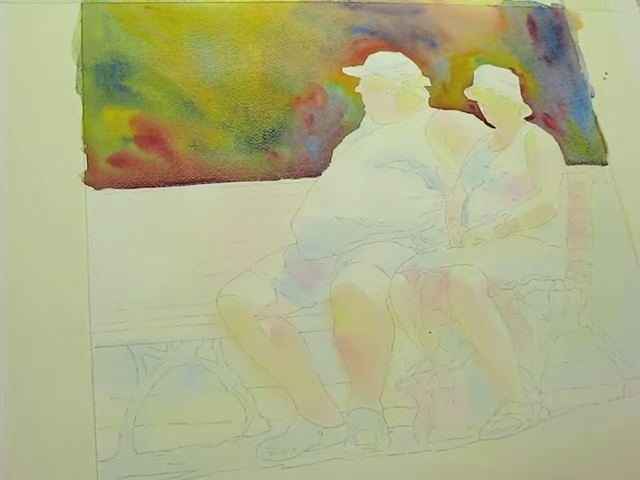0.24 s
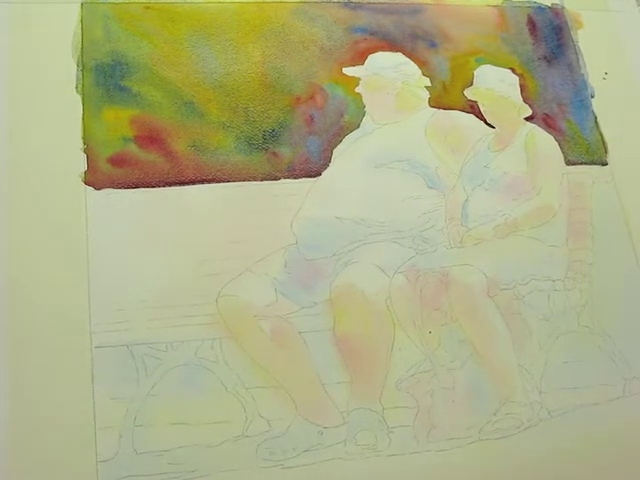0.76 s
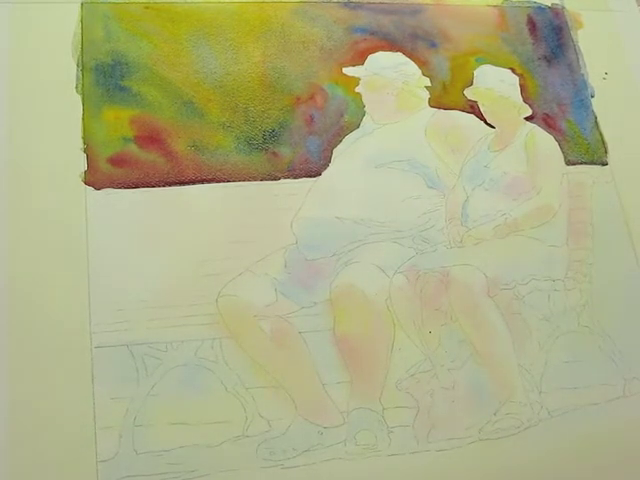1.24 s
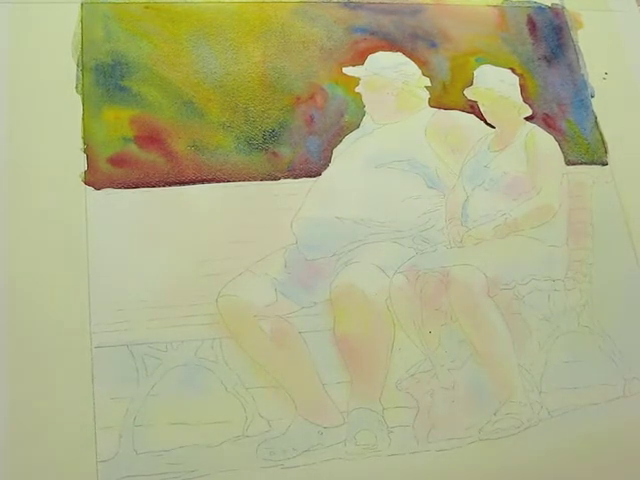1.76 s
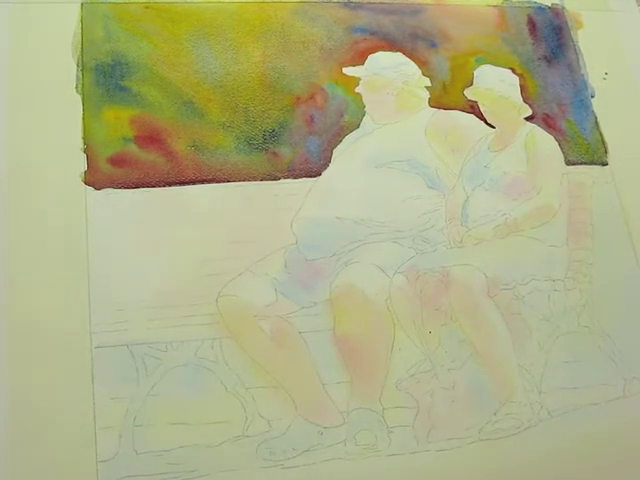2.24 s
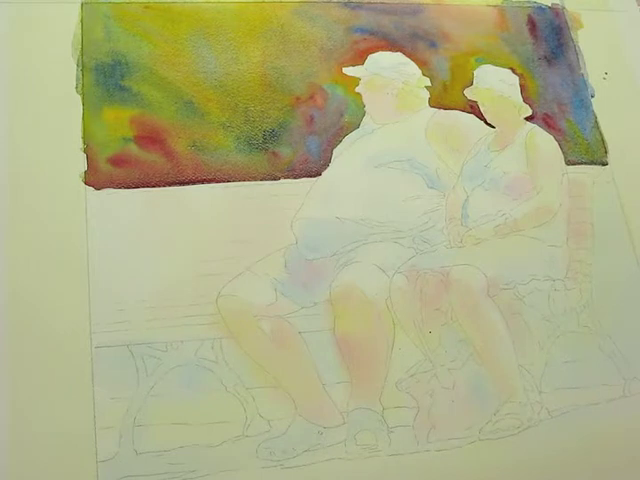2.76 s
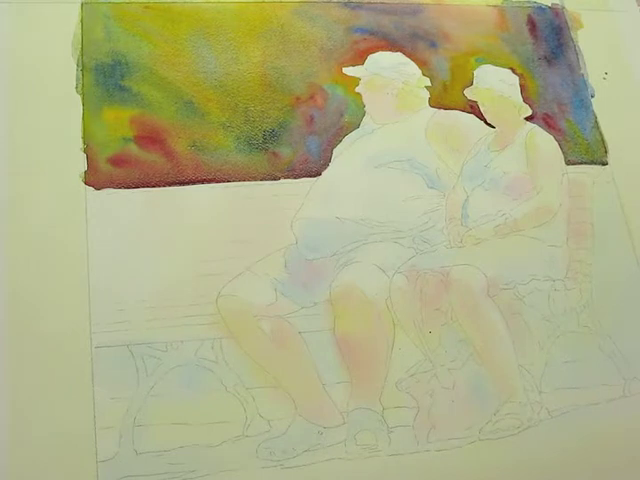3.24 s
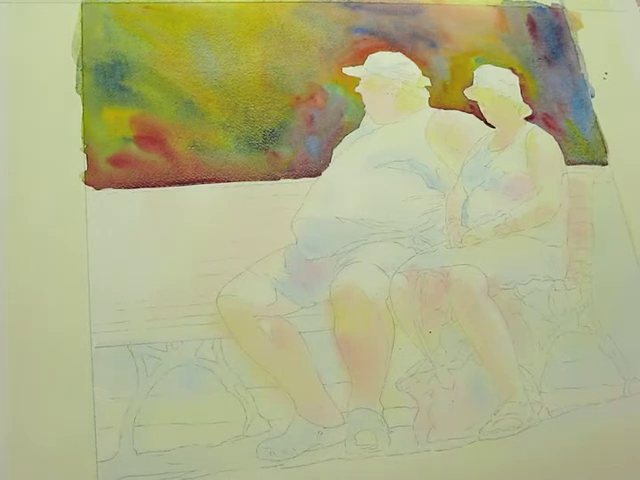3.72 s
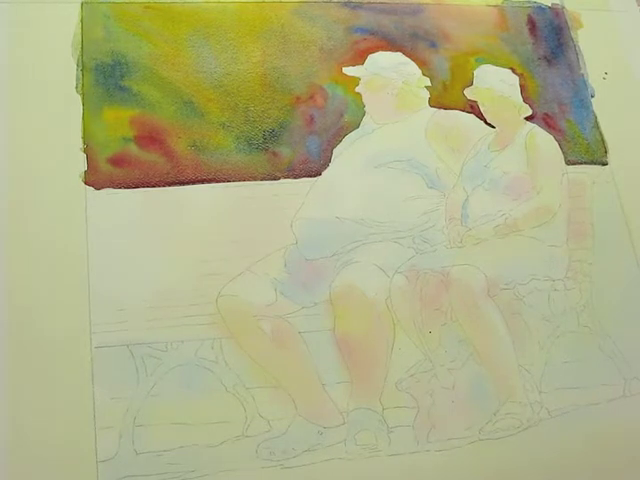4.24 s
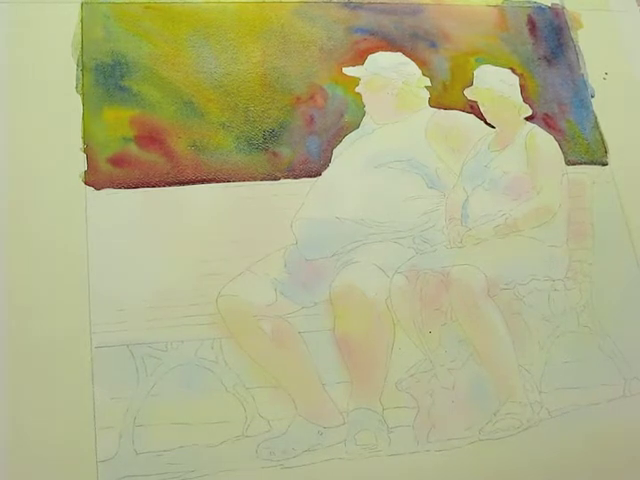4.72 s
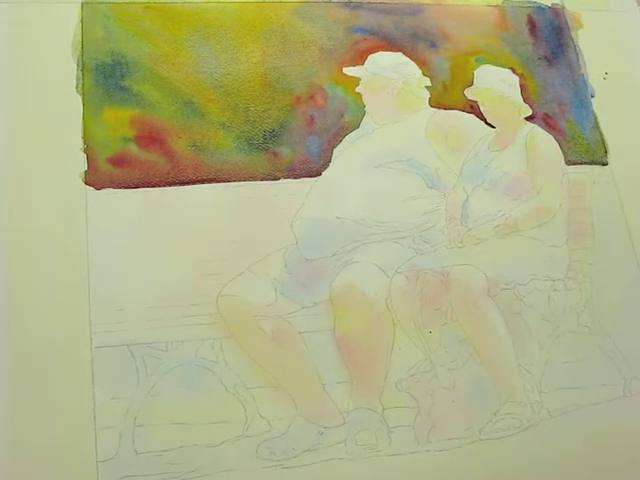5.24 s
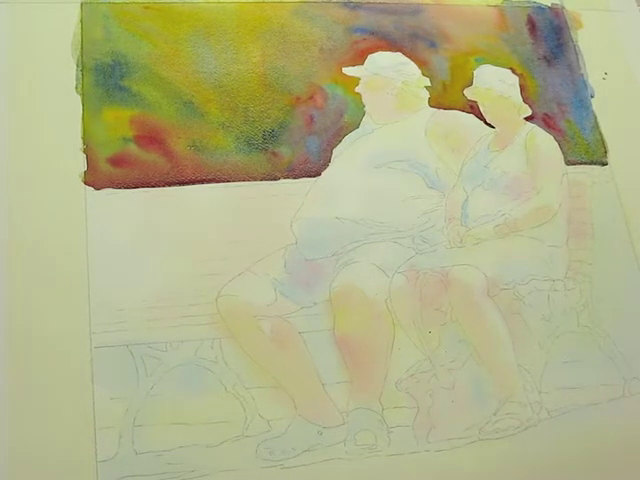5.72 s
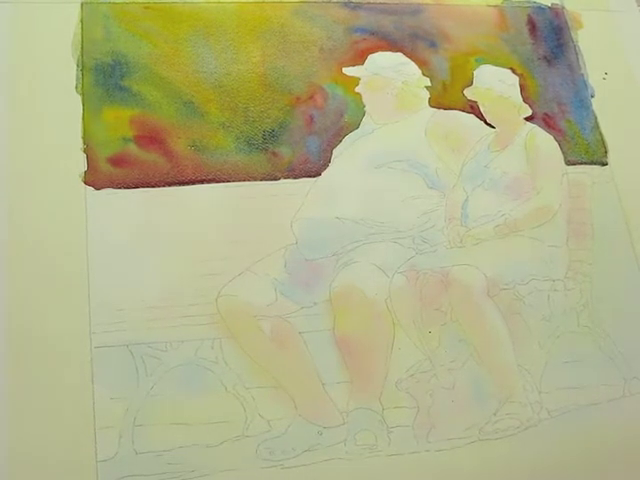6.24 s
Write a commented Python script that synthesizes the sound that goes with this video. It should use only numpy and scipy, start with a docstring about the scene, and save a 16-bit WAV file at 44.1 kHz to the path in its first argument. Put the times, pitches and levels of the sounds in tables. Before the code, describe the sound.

Close watery swishing of a brush in a small jar: low gulps, bright bubble plinks, fizzy froth, sharp taps on the wall, then near quiet.

```python
"""Paintbrush in a jar of water

Heard close, on a table in a small room: a brush is swished in three bouts, two easy and one about twice as fast.
Each stroke traps air: big pockets gulp, small bubbles plink, froth and spray burst, all as dying tones or ticks.
These water sounds ring the air in the jar; filtered noise bursts make the handle's knocks on its wall.
The wet bristles are wiped a few times in soft swells of noise, and a faint steady hiss lies under everything."""
import sys
import numpy as np
from scipy import signal
from scipy.fft import rfft, irfft
from scipy.io import wavfile

SR = 44100
rng = np.random.default_rng(int(sys.argv[2]) if len(sys.argv) > 2 else 0)


def file_out(sig):
    """Save sig as 16-bit WAV at sys.argv[1]."""
    # one column per channel
    cols = np.atleast_2d(sig).T
    # limit, then scale
    lim = np.clip(cols, -1, 1)
    pcm = np.round(lim * 32767).astype(np.int16)
    wavfile.write(sys.argv[1], SR, pcm)


N = 286076
T = np.arange(N) / SR  # seconds

# Levels in the event tables are ahead of each layer's mix gain.
# Air pockets closing behind the brush. Each row: start in seconds, level in dB, pitch in Hz.
GULP_EVENTS = [(0.142, -30.5, 752), (0.356, -31.5, 692), (0.584, -18.5, 487), (0.5956, -19.5, 538),
               (0.715, -33, 593), (0.802, -36.5, 640), (0.869, -29.5, 483), (0.884, -22.5, 436),
               (1.048, -29.5, 520), (1.082, -28, 817), (1.117, -27, 487), (1.215, -31.5, 538),
               (1.295, -33.5, 533), (1.497, -38, 695), (2.388, -26, 494), (2.398, -23.5, 576),
               (2.43, -27.5, 438), (2.715, -28.5, 952), (3.068, -31.5, 720), (3.398, -31.5, 900),
               (3.581, -28, 748), (3.726, -29.5, 745), (4.699, -26.5, 575), (4.861, -28.5, 444),
               (4.955, -28, 434), (5.106, -29.5, 507), (5.195, -32.5, 427)]
# Bouts of swishing. Each row: first stroke in seconds, end in seconds, strokes per second,
# churn level in dB, fizz level in dB, stray bubble level in dB.
SWISH_BOUTS = [(0.115, 1.586, 7, -47.5, -69, -36.5), (2.283, 4.015, 5.25, -53.5, -62, -40),
               (4.7, 5.083, 11.9, -40, -40, -33.5)]
# Modes of the table top under the jar. Each row: frequency in Hz, width in Hz, level in dB.
TABLE_TOP = [(117, 15, 2), (235, 12.4, 5.5), (330, 27, 7)]
# Colour of stirred water. Each row: frequency in Hz, level in dB per Hz.
WATER_COLOUR = [(150, -36), (400, -9), (800, -1.5), (1400, 3.5), (2300, 2), (4800, 0.5), (7000, -2.5),
                (15000, -6)]


def undb(db):
    """Decibels to gain."""
    return 10 ** (np.asarray(db) / 20)


def unit(x):
    """Scale to rms 1."""
    return x / np.sqrt(np.mean(x ** 2))


def add(out, s, sound):
    """Mix a sound in at time s."""
    i = int(np.clip(s * SR, 0, N - 1))
    out[i:i + len(sound)] += sound[:N - i]


def convolve(x, response):
    """Play x through an impulse response."""
    return signal.fftconvolve(x, response)[:N]


def colour(x, points, size=4096):
    """Causal filter through (Hz, dB) points; white noise keeps its level."""
    hz, db = np.transpose(points)
    bins_hz = np.arange(size // 2 + 1) * SR / size
    curve = np.interp(np.log(np.maximum(bins_hz, 1)), np.log(hz), db)
    # folding the cepstrum forward in time gives minimum phase
    cepstrum = irfft(np.log(undb(curve)))
    cepstrum[1:size // 2] *= 2
    cepstrum[size // 2 + 1:] = 0
    response = irfft(np.exp(rfft(cepstrum)))
    return convolve(x, response / np.linalg.norm(response))


def highpass(x, hz):
    """Small sources radiate little bass."""
    return signal.sosfilt(signal.butter(3, hz, "high", fs=SR, output="sos"), x)


def resonate(x, modes, size=8192):
    """A bank of ringing modes, each with its own gain at the centre."""
    t = T[:size]
    response = np.zeros(size)
    for hz, width, db in modes:
        gain = undb(db) * 2 * np.pi * width / SR
        response += gain * np.exp(-np.pi * width * t) * np.cos(2 * np.pi * hz * t)
    return convolve(x, response)


def bubble(hz, cycles, glide, rise_cycles=0.12):
    """A pulsing air bubble: it dies by 60 dB in so many cycles while its pitch glides up, or down if negative."""
    life = max(cycles, 2) / hz
    t = T[:int(life * SR) + 2]
    swell = 1 - np.exp(-t * hz / rise_cycles)
    decay = np.exp(-np.log(1000) * t / life)
    tone = np.sin(2 * np.pi * hz * t * (1 + glide * (t / life - .3) / 2))
    return tone * swell * decay


def burst(decay_s):
    """A short crack of dying noise."""
    t = T[:int(7 * decay_s * SR) + 2]
    return rng.standard_normal(len(t)) * np.exp(-t / decay_s)


def gulps(gain_db=3, slap_db=-16, table_db=-1, slosh_octaves=0.33, slosh_ceiling_db=-26, count=3):
    """Large air pockets ring low and fall in pitch as they are dragged under; the water slaps shut and rocks on."""
    t60_s = 0.034
    # rebounds closing on lesser pockets: interval, first level re the gulp (limited), loss per rebound
    slosh_s, slosh_db, slosh_loss_db = .026, -10, 2
    rings, slaps, shoves = np.zeros(N), np.zeros(N), np.zeros(N)
    loudest_db = max(row[1] for row in GULP_EVENTS)
    for s, db, hz in GULP_EVENTS:
        add(rings, s, undb(db) * bubble(hz, t60_s * hz, glide=-0.027, rise_cycles=0.33))
        add(slaps, s, undb(db) * burst(decay_s=0.024))
        # heavy gulps shove the jar, and so the table, disproportionately hard
        shove_db = db + .5 * (db - loudest_db)
        add(shoves, s, undb(shove_db) * np.hanning(SR // 400))
        for k, (late, size) in enumerate(rng.random((count, 2))):
            pitch = hz * 2 ** (slosh_octaves * (2 * size - 1))
            rebound_db = min(db, slosh_ceiling_db) + slosh_db - k * slosh_loss_db
            rebound = undb(rebound_db) * bubble(pitch, t60_s * pitch, glide=0.06)
            add(rings, s + slosh_s * (k + .5 + late), rebound)
    slaps = colour(slaps, [(90, -28.0), (220, -0.5), (310, 3), (500, -3),
                           (850, -4), (1200, -6.5), (3000, -49), (10000, -47)])
    shaken_table = resonate(shoves, TABLE_TOP)
    return undb(gain_db) * rings + undb(slap_db) * slaps + undb(table_db) * shaken_table


def bubbles(gain_db=6, snap_db=-15, shed_db=-12, shed_s=.028, shed_octaves=0.442, count=4):
    """Each bubble starts with the wet snap of its neck closing and sheds a few lesser, mostly higher ones."""
    # Larger bubbles pinching off near the surface.
    # Each row: start in seconds, level in dB, pitch in Hz, ring in cycles.
    pinch_offs = [(0.0245, -42, 1186, 67), (0.0977, -28, 2090, 28), (0.1107, -34, 1640, 41),
                  (0.2359, -36, 1500, 48), (0.3581, -30.5, 1680, 21), (0.415, -31.5, 3380, 72),
                  (0.5734, -22.5, 3070, 8.5), (0.5822, -33.5, 1690, 11), (0.8652, -34.5, 1600, 26),
                  (0.8845, -25, 2150, 59), (0.9052, -27, 3100, 54), (1.0461, -29.5, 2470, 21),
                  (1.1048, -26, 1650, 30), (1.1149, -18, 1586, 27), (1.2082, -35.5, 2620, 48),
                  (1.5812, -16.5, 4580, 22), (1.6827, -33, 1510, 32), (2.0258, -39, 2010, 17),
                  (2.356, -31.5, 1250, 16), (2.389, -31, 1120, 21), (2.4321, -29, 1150, 21),
                  (2.4422, -20, 1280, 11.6), (2.5363, -40.5, 1354, 57), (2.6327, -40.5, 1520, 32),
                  (2.712, -29.5, 1186, 9.2), (2.8035, -38.5, 2180, 45), (2.8859, -39.5, 1340, 58),
                  (2.9766, -34, 1624, 37), (3.0666, -36.5, 1131, 79), (3.0822, -34, 1104, 36),
                  (3.1302, -34.5, 1400, 25), (3.235, -40.5, 2030, 17), (3.3872, -27.5, 1200, 8.3),
                  (3.4716, -33.5, 1560, 27), (3.5623, -23, 4450, 18), (4.6208, -21, 2803, 59),
                  (4.6493, -28.5, 1355, 25), (4.6972, -26, 1330, 17), (4.7593, -28.5, 2390, 21),
                  (4.7748, -20.5, 2560, 13), (4.7875, -25.5, 2710, 27), (4.8582, -22, 3720, 53),
                  (4.9794, -28, 1620, 15), (5.0452, -28, 2660, 60)]
    rings, snaps = np.zeros(N), np.zeros(N)
    for s, db, hz, cycles in pinch_offs:
        add(rings, s, undb(db) * bubble(hz, cycles, glide=0.033, rise_cycles=0.57))
        add(snaps, s, undb(db) * burst(decay_s=.005))
        for late, size in rng.random((count, 2)):
            pitch = hz * 2 ** (shed_octaves * (3 * size - 1))
            lesser = undb(db + shed_db - 7.0 * late) * bubble(pitch, cycles=33.0, glide=0.15)
            add(rings, s + shed_s * late, lesser)
    return undb(gain_db) * rings + undb(snap_db) * colour(snaps, WATER_COLOUR)


def swishing(levels_db):
    """Strength of the stirring: each bout builds up, swells with every stroke of the brush and settles."""
    attack_s, release_s = 0.12, 0.099
    calming_db_per_s = 113  # the water calms between strokes, so slow strokes dip further
    out = np.zeros(N)
    for (start, end, rate, *_), db in zip(SWISH_BOUTS, levels_db):
        build_up = np.clip((T - start) / attack_s + 1, 0, 1)
        settling = np.exp(-np.maximum(T - end, 0) / release_s)
        dip_db = calming_db_per_s / (2 * rate) * np.sin(np.pi * rate * (T - start)) ** 2
        out += build_up * settling * undb(db - dip_db)
    return out


def strays(rate=60, low_hz=800, high_hz=5600, spread_db=4, gain_db=-2, tilt_db=2, count=600):
    """Lesser bubbles ring at uneven intervals, louder while the water is stirred and when higher in pitch."""
    out = np.zeros(N)
    draws = rng.random((count, 3))[:int(rate * N / SR)]
    for k, (late, pitch, size) in enumerate(draws):
        hz = low_hz * (high_hz / low_hz) ** pitch
        db = gain_db + spread_db * (2 * size - 1) + tilt_db * (2 * pitch - 1)
        add(out, (k + late) / rate, undb(db) * bubble(hz, cycles=60, glide=0.12, rise_cycles=0.88))
    return out * swishing([row[-1] for row in SWISH_BOUTS])


def froth(gain_db=-3, length_s=.018, spread_octaves=0.21, count=6):
    """Froth squeezed from the bristles: quick clusters of fine bubbles of nearly one size."""
    # Each row: start in seconds, level in dB, centre pitch in Hz.
    clusters = [(0.2268, -28, 4800), (0.3444, -34, 5930), (0.5484, -46, 4100), (1.046, -26.5, 5760),
                (1.3828, -32.5, 4240), (1.504, -32.5, 5400), (2.2725, -34.5, 3620), (2.357, -31, 3030),
                (2.4185, -34, 4300), (3.456, -35, 4230), (3.606, -34.5, 3030), (4.6082, -30, 2990),
                (4.6897, -22.5, 5500), (4.8197, -24.5, 5100), (5.0202, -26.5, 4050)]
    out = np.zeros(N)
    for s, db, hz in clusters:
        for late, size, strength in rng.random((count, 3)):
            pitch = hz * 2 ** (spread_octaves * (2 * size - 1))
            fine_bubble = bubble(pitch, cycles=36, glide=0.088)
            add(out, s + length_s * late, undb(db) * (.5 + strength) * fine_bubble)
    return undb(gain_db) * out


def specks(rate=16, low_hz=5200, high_hz=15000, spread_db=5, gain_db=-3, rest_db=-46, count=200):
    """Faint films burst by chance, harder while stirred: rows of seconds, level in dB and pitch in Hz."""
    strength = np.hypot(swishing([row[-1] for row in SWISH_BOUTS]), undb(rest_db))
    late, pitch, size = rng.random((count, 3))[:int(rate * N / SR)].T
    s = (np.arange(len(late)) + late) / rate
    db = 20 * np.log10(np.interp(s, T, strength)) + gain_db - 2 * spread_db * size
    return list(zip(s, db, low_hz * (high_hz / low_hz) ** pitch))


def spray(ring_db=11, tick_db=2, corner_hz=10000):
    """Films and droplets burst in bright ticks, each with a brief high ring; the finest snap the hardest."""
    # The sharpest bursts. Each row: start in seconds, level in dB, pitch in Hz.
    sharpest = [(0.062, -40, 9550), (0.2713, -41, 6000), (0.3177, -34.5, 5530), (0.5828, -38, 12500),
                (1.0823, -29.5, 10850), (1.2019, -33, 8570), (2.441, -27.5, 14800), (2.4633, -33, 9400),
                (2.5388, -27, 10400), (2.7144, -31.5, 11000), (2.795, -33, 13000), (3.0584, -43, 12500),
                (3.39, -42, 6900), (4.6679, -29, 10750), (4.7137, -30.5, 5300), (4.791, -23.5, 10100),
                (4.8605, -25, 5630), (5.1072, -24.5, 15100), (6.124, -36.5, 10560)]
    rings, ticks = np.zeros(N), np.zeros(N)
    for s, db, hz in list(sharpest) + specks():
        add(rings, s, undb(db) * bubble(hz, cycles=119, glide=0.48, rise_cycles=5.4))
        add(ticks, s, undb(db) * min(hz / corner_hz, 1) * burst(decay_s=0.0048))
    ticks = colour(ticks, [(1000, -4.0), (4000, 3.0), (8000, 4.5), (15500, 8.5)])
    return undb(ring_db) * rings + undb(tick_db) * ticks


def swarm(rate, low_hz, high_hz, cycles, spread_db, glide, count=20000):
    """Many small bubbles at random moments, rate per second, most faint and a few strong."""
    out = np.zeros(N)
    draws = rng.random((count, 4))
    for when, pitch, size, ring in draws[:int(rate * N / SR)]:
        hz = low_hz * (high_hz / low_hz) ** pitch
        strength = undb(-spread_db * np.log(max(size, .06))) * (hz / low_hz) ** 0.19
        small_bubble = bubble(hz, cycles * (.5 + ring), glide, rise_cycles=0.99)
        add(out, when * N / SR, strength * small_bubble)
    return unit(out)


def wake(ceiling_db=-31, settle_s=0.037):
    """Every gulp leaves the water agitated for a moment, up to a limit."""
    out = np.zeros(N)
    for s, db, _ in GULP_EVENTS:
        add(out, s, undb(min(db, ceiling_db)) * np.exp(-T[:SR] / settle_s))
    return out


def churn(churn_db=-2.0, fizz_db=-2, rest_fizz_db=-64):
    """Moving bristles shed a dense swarm of little bubbles and a finer fizz; a little foam bursts on at rest."""
    wake_churn_db, wake_fizz_db = -17, -25  # relative to the wake
    coarse = swarm(rate=900, low_hz=469.7, high_hz=6610, cycles=30, spread_db=4, glide=0.12)
    coarse = unit(colour(coarse, WATER_COLOUR))
    fine = swarm(rate=1800, low_hz=4570, high_hz=16000, cycles=38, spread_db=9, glide=0.54)
    *_, stir_db, foam_db, _ = np.transpose(SWISH_BOUTS)
    agitation = wake()
    stir = np.hypot(swishing(stir_db), undb(wake_churn_db) * agitation)
    foam = np.hypot(swishing(foam_db), undb(wake_fizz_db) * agitation)
    foam = np.hypot(foam, undb(rest_fizz_db))
    return undb(churn_db) * coarse * stir + undb(fizz_db) * fine * foam


def jar_air(water):
    """The air in the jar above the water resonates with the sounds made below it."""
    # Each row: frequency in Hz, width in Hz, level in dB.
    air_modes = [(395, 19, -4), (437, 50, -8.5), (544, 30, -1), (546, 18.5, 2.5), (1162, 215, 0.5),
                 (1290, 23, -25), (1620, 230, 1.5), (1525, 65, -26), (1990, 140, -0.5), (2250, 350, 1.5),
                 (2680, 30, -38), (2900, 20, 9.5), (3900, 110, -7)]
    return resonate(water, air_modes)


def knocks(contact_db=-2, wall_db=0, table_db=-7):
    """The handle strikes the jar in noise bursts that ring its wall briefly; the table hums under it."""
    # Each row: start in seconds, level in dB, contact decay in seconds.
    strikes = [(1.115, -24.5, .004), (1.382, -44.5, 0.0079), (3.8334, -20.5, 0.0039), (3.915, -36, 0.0096),
               (4.712, -25, 0.0068), (4.789, -29.5, 0.0021), (4.857, -24.5, 0.007), (4.862, -19.5, 0.0073),
               (4.9368, -20.5, 0.0022), (5.1638, -14, 0.0045), (5.175, -33.5, 0.058)]
    # Each row: frequency in Hz, level in dB per Hz.
    contact_colour = [(100, -7.5), (250, 1.5), (600, 4), (1500, 9), (3800, 8.5), (5500, 3), (9000, 2),
                      (15500, -4)]
    # Each row: frequency in Hz, width in Hz, level in dB.
    wall_modes = [(360, 140, -0.5), (480, 92, -1), (1210, 110, -1.5), (2020, 390, -5), (2875, 59, 1.5),
                  (3800, 290, -8), (4090, 140, 7)]
    contact = np.zeros(N)
    for s, db, decay_s in strikes:
        add(contact, s, undb(db) * burst(decay_s))
    contact = highpass(colour(contact, contact_colour), hz=91)
    wall = resonate(contact, wall_modes)
    hum = resonate(contact, TABLE_TOP)
    return undb(contact_db) * contact + undb(wall_db) * wall + undb(table_db) * hum


def wipes():
    """Wiped bristles: soft swells of friction noise."""
    # Each row: start in seconds, length in seconds, level in dB.
    strokes = [(5.517, 0.17, -49), (5.672, 0.097, -50), (5.797, 0.056, -45.5), (6.182, 0.051, -45.5),
               (6.21, 0.063, -50)]
    # Each row: frequency in Hz, level in dB per Hz.
    friction_colour = [(200, -19), (600, -0.5), (1300, -2.5), (2700, 4.5), (5000, -1), (9000, -3),
                       (15500, -8)]
    pressure = np.zeros(N)
    for s, length, db in strokes:
        add(pressure, s, undb(db) * np.sqrt(np.hanning(int(length * SR))))
    return pressure * colour(rng.standard_normal(N), friction_colour)


def room(x, tail_db=-9, low_t60=0.39, high_t60=0.17, build_s=0.0051, size=22050):
    """Direct sound, a few close echoes and a short diffuse tail that loses its treble first."""
    # Echoes from the table and things close by. Each row: delay in seconds, gain as a plain factor.
    close_echoes = [(.0023, 0.19), (.0045, 0.19), (0.0109, 0.12), (0.0137, 0.094)]
    t = T[:size]
    low_points = [(100, 0.5), (700, 11.5), (2500, -6), (6000, -6.0), (15000, -12.0)]
    high_points = [(100, 2.5), (4500, 3.0), (8000, 2.5), (15000, -3.5)]
    low = colour(rng.standard_normal(N), low_points)[:size] * undb(-60 * t / low_t60)
    high = colour(rng.standard_normal(N), high_points)[:size] * undb(-60 * t / high_t60)
    tail = (0.26 * low + 0.82 * high) * (1 - np.exp(-t / build_s))
    response = undb(tail_db) * tail / np.linalg.norm(tail)
    response[0] += 1  # direct sound
    for delay, gain in close_echoes:
        add(response, delay, np.array([gain]))
    return convolve(x, response)


def hiss(level_db=-50.5):
    """A faint steady floor of coloured noise."""
    # Each row: frequency in Hz, level in dB per Hz, before the whole is set to level_db rms.
    floor_colour = [(12, -1), (20, -8), (93, -1.5), (127, -1.5), (228, -0.5), (399, -1), (642, 0),
                    (1090, -5), (1190, -3), (1330, -5), (2820, -8), (3070, -7.5), (3740, -9), (7950, -14.5),
                    (16000, -19.5)]
    return undb(level_db) * unit(colour(rng.standard_normal(N), floor_colour))


def scene(jar_db=-1, water_db=-3):
    """Water sounds leave the jar both directly and through its air resonances."""
    water = gulps() + bubbles() + strays() + froth() + spray() + churn()
    water = highpass(water, hz=183)
    jar = undb(water_db) * (water + undb(jar_db) * jar_air(water))
    floor = hiss()
    return (room(jar + knocks() + wipes()) + floor)[None]


def record(dry):
    """The recorder rounds the sharpest peaks and cuts the top."""
    ceiling, top_hz = .28, 16000
    rounded = ceiling * np.tanh(dry / ceiling)
    return signal.sosfilt(signal.ellip(10, .2, 70, top_hz, fs=SR, output="sos"), rounded)


dry = scene()
out = record(dry)
file_out(out)
```